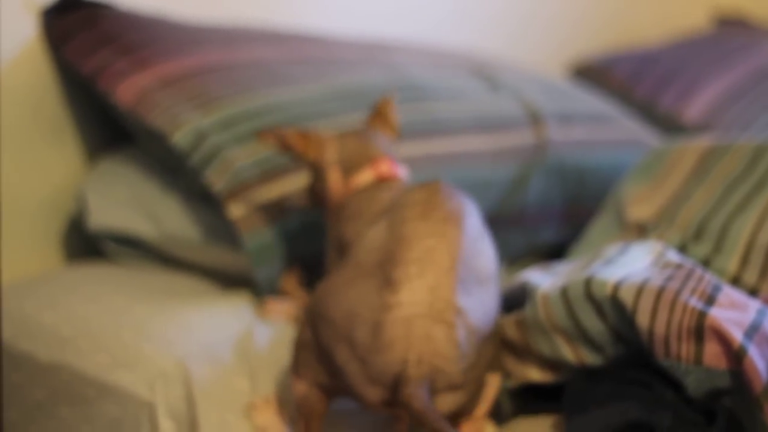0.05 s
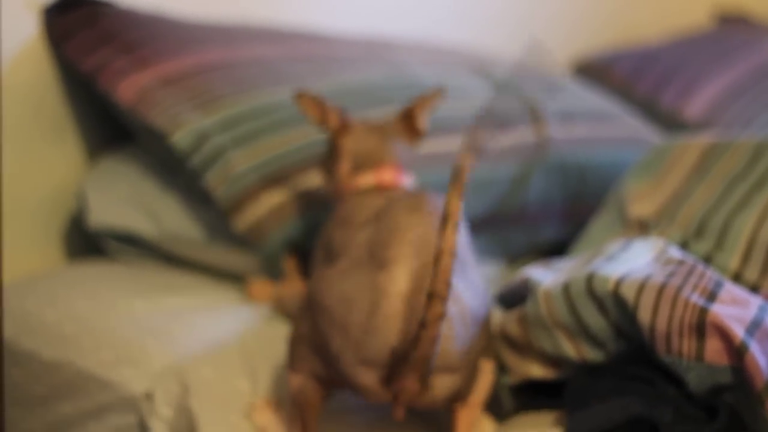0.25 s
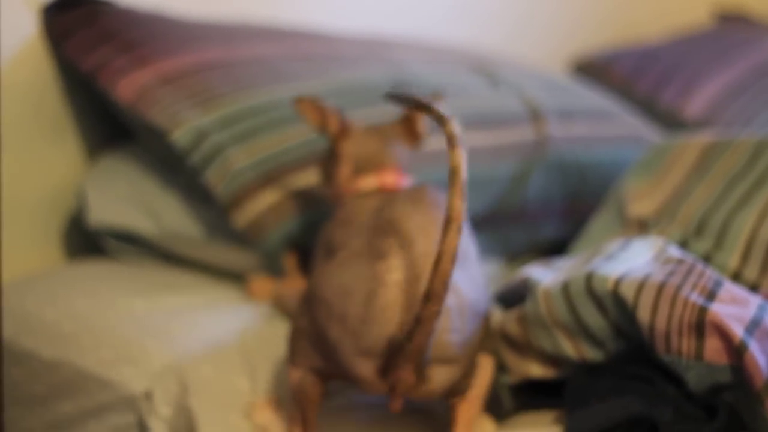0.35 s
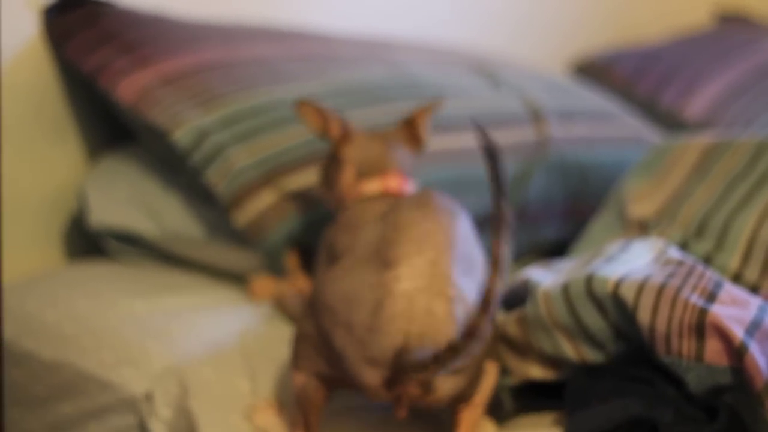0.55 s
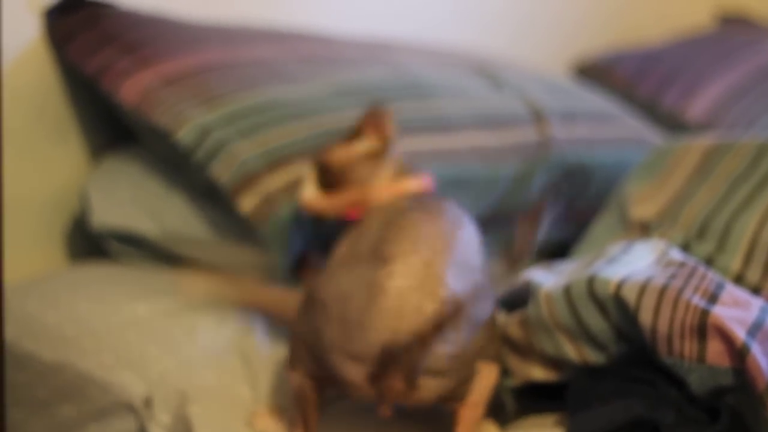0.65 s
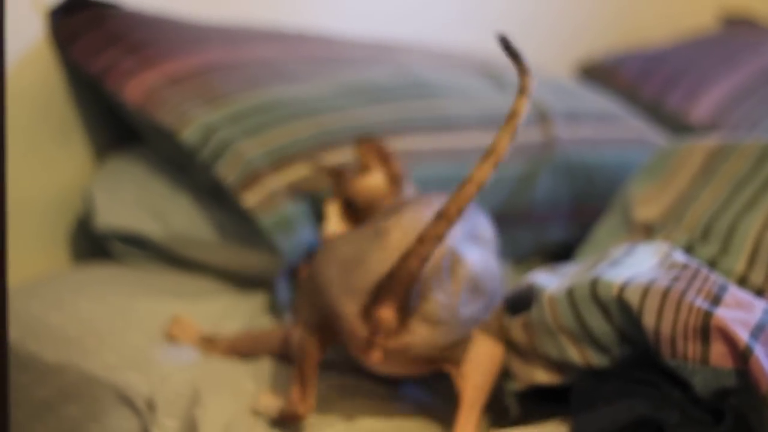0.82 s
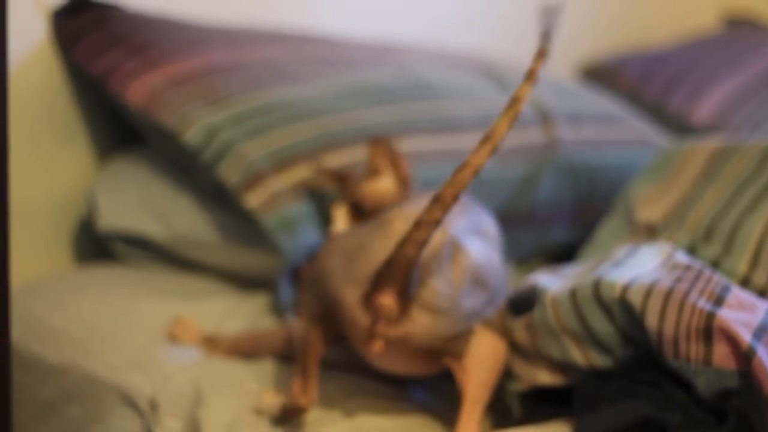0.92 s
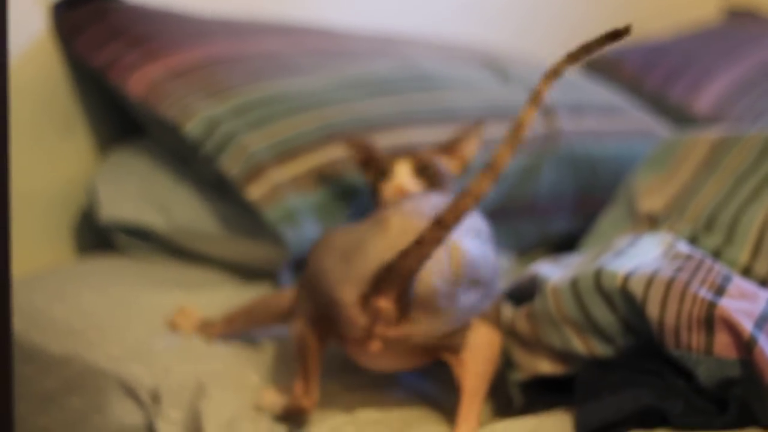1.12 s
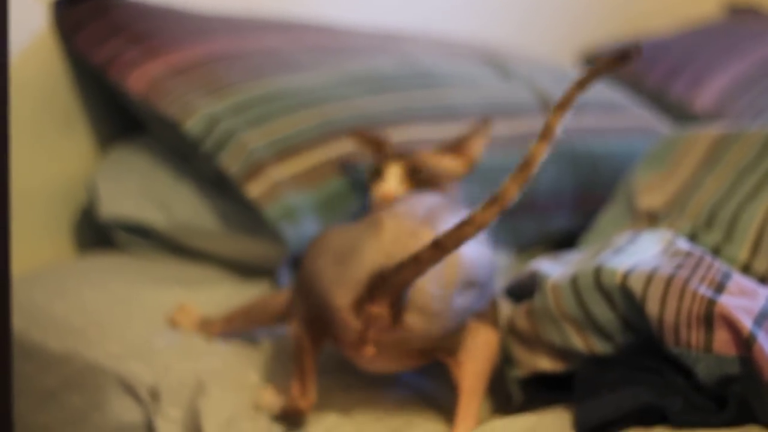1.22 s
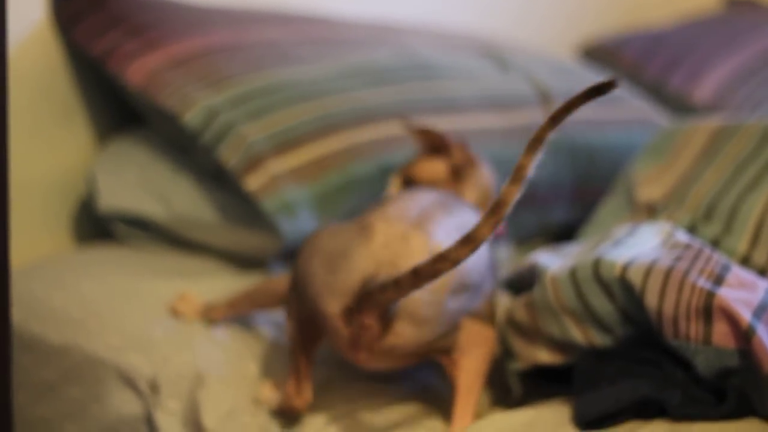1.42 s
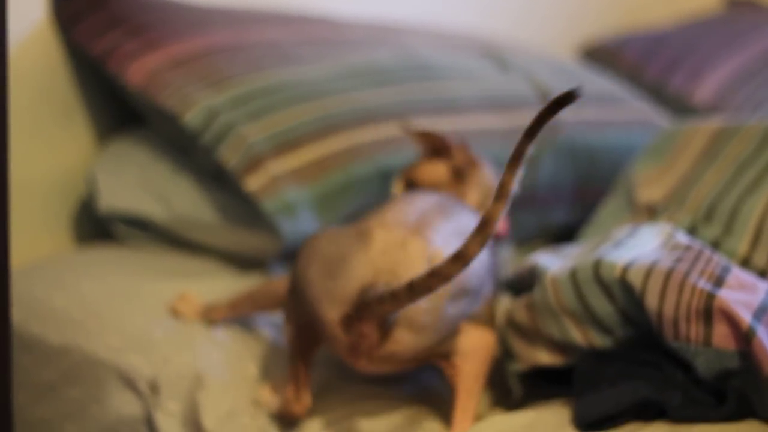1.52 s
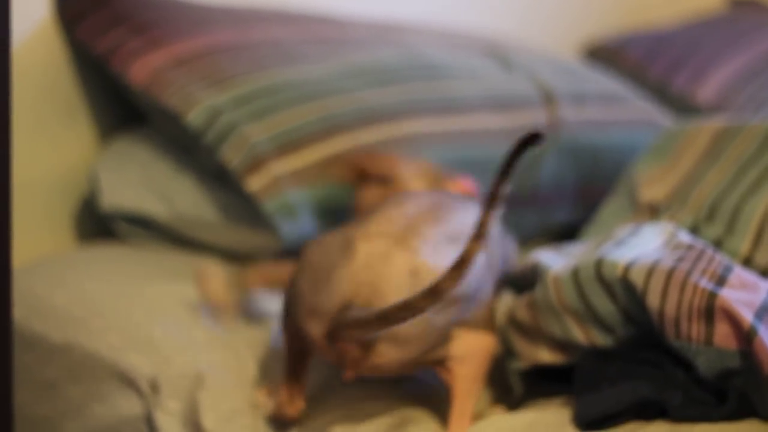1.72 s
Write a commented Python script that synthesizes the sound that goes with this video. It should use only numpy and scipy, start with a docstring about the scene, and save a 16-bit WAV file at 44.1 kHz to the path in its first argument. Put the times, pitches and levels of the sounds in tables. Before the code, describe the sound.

A cat's little collar bell tinkles unevenly as the cat shifts on a bed.

```python
"""A cat's collar bell

A cat shifts about on a bed in a small room, and the little bell on its collar jingles in bursts.
A pellet strikes and rolls inside the shell; fur chokes the ring, and the room carries it on.
The bedding rustles and thumps softly under the paws, and there is one light knock.
Behind it all, a fan hums and blows air."""
import sys
import numpy as np
from scipy import signal
from scipy.fft import rfft, irfft, next_fast_len
from scipy.io import wavfile
from scipy.ndimage import map_coordinates

SR = 44100
rng = np.random.default_rng(int(sys.argv[2]) if len(sys.argv) > 2 else 0)


def unload_wav(signal):
    """Save mono or channel-first audio to the path in sys.argv[1] as 16-bit WAV at rate SR, clipped to [-1, 1]."""
    wavfile.write(
        sys.argv[1],
        SR,
        np.round(np.clip(np.atleast_2d(signal).T, -1, 1) * 32767).astype(np.int16),
    )


N = 77175

# The pellet hits the shell. A fade time is how long a sound takes to drop by 60 dB.
# The last four columns are relative to the strike's level.
# (time [s], level [dB], fade time [s], low overtone [dB], high overtone [dB], click [dB], rattle [dB])
PELLET_STRIKES = [(.000, -36, 0.021, -28, -33, -29, -31), (.066, -51.5, 0.043, -12, -20, -17, -30),
                  (.196, -34.5, 0.032, -24, -30, -22, -9), (0.212, -21, 0.029, -31, -32, -19, -26),
                  (0.221, -29, 0.11, -30, -26, -24, -24), (0.2269, -21.5, 0.069, -30, -20, -15, -22),
                  (.239, -26.5, 0.099, -31, -14, -31, -24), (0.246, -23, 0.038, -34, -15, -24, -22),
                  (0.258, -42, 0.061, -25, -25, -21, -17), (.281, -34.5, 0.031, -22, -4, -22, -16),
                  (0.2918, -30, 0.06, -28, -20, -12, 1), (0.306, -45, 0.033, -23, -18, 14.5, -12),
                  (0.3312, -43, 0.057, -36, -34, -32, -12), (0.335, -30.5, 0.075, -24, -29, -18, -5),
                  (0.365, -29.5, 0.012, -30, -24, -23, -6), (0.378, -32.5, 0.046, -33, -28, -23, -14),
                  (0.4582, -25, .02, -33, -30, -13.5, -24), (0.471, -26, 0.022, -36, -36, -29, -28),
                  (0.488, -30.5, 0.05, -31, -28, -29, -6), (0.5231, -33, 0.025, -39, -34, -24, -26),
                  (0.68, -20, 0.044, -35, -30, -19, -18), (0.6829, -9.5, 0.015, -20, -29.5, -16.5, -25),
                  (.720, -10.5, 0.01, -34, -28, -26, -8.5), (0.726, -35, 0.045, -8, -24, -22, 4),
                  (0.7495, -28, 0.053, -24, -24, -5, -9), (.755, -36, 0.023, -20, -20, -1, -7),
                  (.771, -40, 0.04, -4, -18, 5, -14), (.779, -22, 0.033, -22, -32, -22, -1),
                  (.789, -20.5, 0.045, -32, -32, -17, -17), (0.7929, -13.5, 0.0073, -31, -33, -10.5, -14),
                  (0.7999, -22.5, 0.078, -29, -29, -23, -18), (.830, -41, 0.017, -14, -8, -11, -16),
                  (1.0772, -38, 0.083, -17, -32, -13, -21), (1.087, -36, 0.054, -13, -24, -6, -14),
                  (1.1203, -27.5, 0.0062, -25, -23, 3.5, -5), (1.128, -29.5, .02, -24, -23, 1.5, -10),
                  (1.14, -46, 0.026, -18, 3, -16, -10), (1.1471, -22.5, 0.028, -32, -18, -6.5, 4),
                  (1.159, -28, 0.016, -25, -11, -3, 1), (1.2116, -25.5, 0.028, -21, -5.5, -8.5, -1),
                  (1.271, -37.5, .025, -17, -9, -10, -5), (1.315, -51, 0.034, -8, -12, -14, -8),
                  (1.362, -45, 0.094, -28, -28, -20, -8), (1.3719, -39, 0.023, -29, -27, -31, 4),
                  (1.381, -49, 0.014, -27, -12, -15, -15), (1.4704, -35, 0.072, -20, -24, -31, 6),
                  (1.501, -37.5, 0.037, -29, -25, -18, -2.5), (1.5855, -37, 0.036, -26, -26, -25, -1),
                  (1.6384, -52, 0.032, -26, -26, -18, -15), (1.733, -49, .02, -26, -28, -16, -8)]
# Weaker tones of the slit shell (pitch [Hz], level next to the main tone [dB], fade time [s])
SLIT_TONES = [(5360, -14, 0.028), (5746, -10, 0.039), (4774, -30, 0.048), (6390, -24.5, 0.028)]
# Tone colour of the pellet's click (frequency [Hz], level [dB])
CLICK_COLOUR = [(1000, -40), (3000, -9), (5000, -22), (7000, 14), (10000, -1.5), (16000, -32)]
# Loudness of the bedding's bright rustle (time [s], level [dB])
RUSTLE_LEVELS = [(0, -69), (.12, -66.5), (.18, -57.5), (.23, -45), (.29, -49.5), (.4, -66.5), (.63, -68),
                 (.68, -47.5), (.77, -48.5), (.83, -51), (.9, -64), (1.05, -66.5), (1.11, -56), (1.17, -73),
                 (1.3, -62), (1.67, -64.5), (1.705, -54), (1.75, -60.5)]
# Tone colour of that rustle (frequency [Hz], level [dB])
RUSTLE_COLOUR = [(500, -2), (2000, -3.5), (4000, -5), (7000, 2.5), (10000, -9), (15500, -17.5)]
# Loudness of the bedding's dull swish (time [s], level [dB])
SWISH_LEVELS = [(0, -55.5), (.6, -55), (.72, -47), (.9, -71), (1.15, -54), (1.36, -46), (1.45, -48),
                (1.52, -47), (1.59, -47.5), (1.67, -48.5), (1.75, -48)]
# Tone colour of that swish (frequency [Hz], level [dB])
DULL_COLOUR = [(150, -25), (450, -11.5), (800, 0.5), (1100, -1.5), (1600, -13), (2500, -28), (6000, -49)]
# Steps and scuffs (time [s], level [dB], centre [Hz], half-width [octaves], rise [s], fade time [s])
PAW_STEPS = [(.255, -58, 1890, 0.4, .01, 0.13), (.712, -48, 170, 0.65, 0.0042, 0.062),
             (.762, -42.5, 1660, 1.1, 0.0034, 0.087), (0.766, -53, 75, 1.4, 0.015, 0.16),
             (1.073, -41, 150, 1.15, 0.0039, 0.043), (1.1177, -38.5, 4400, .35, 0.00074, 0.091),
             (1.46, -42.5, 111, 1.05, 0.005, 0.056), (1.599, -53, 1800, 0.38, 0.02, .12),
             (1.638, -34, 780, 0.1, 0.0012, 0.034), (1.6585, -41, 804, 0.2, 0.00075, 0.054)]
# Tones of the knock (pitch [Hz], relative level [dB], fade time [s])
KNOCK_TONES = [(1293, 2.5, 0.066), (1520, -9, 0.023), (2220, -4.5, 0.012)]
# Tone colour of the fan's rushing air (frequency [Hz], level [dB])
AIR_COLOUR = [(10, -29), (25, -23), (70, -18), (125, -9.5), (242, -7), (400, -9), (591, -5), (1040, -7),
              (1500, -11), (2200, -18.5), (3620, -22), (5500, -22), (8000, -30.5), (12000, -44.5),
              (16000, -36.5)]
# Narrow bands where that air drones (centre [Hz], width [Hz], level [dB])
DRONE_BANDS = [(611.6, 36, -56), (720, 14, -62), (825, 81, -63.5), (978, 23, -59.5), (1067.6, 17, -60)]
# Tones of the fan's hum (pitch [Hz], level [dB])
HUM_TONES = [(120, -65.5), (154, -67.5), (307, -62), (326, -56.5), (402, -67.5), (1561, -66.5)]
# How long the room's echo lasts (frequency [Hz], fade time [s])
ECHO_FADES = [(200, 0.48), (2000, 0.22), (5500, 0.21), (9000, 0.16), (14000, 0.12)]
# Tone colour of the echo (frequency [Hz], level [dB])
ECHO_COLOUR = [(200, -22), (5500, -0.5), (9000, -2), (13500, -3)]

BELL_HZ, LOW_OVERTONE_HZ, HIGH_OVERTONE_HZ = 5582, 13170, 13465
OVERTONE_FADE_S, CLICK_FADE_S, RING_RISE_S = 0.031, 0.0044, 0.00026
LOUD_DB, ECHO_CUT_PER_DB = -19.5, 0.53  # strikes louder than this get less echo and sound closer


def bell(detune=0.0031):
    """Each strike of the pellet makes a click, rings the shell and sets off a short rattle."""
    out, t = np.zeros(N), np.arange(SR // 6) / SR
    click_noise = noise(CLICK_COLOUR)
    # so small a shell sends out little low sound
    low_cut = signal.butter(N=4, Wn=4210, btype="high", fs=SR, output="sos")
    for start, db, fade_s, low_db, high_db, click_db, rattle_db in PELLET_STRIKES:
        tones = [(BELL_HZ, 0, fade_s), (LOW_OVERTONE_HZ, low_db, OVERTONE_FADE_S),
                 (HIGH_OVERTONE_HZ, high_db, OVERTONE_FADE_S)] + SLIT_TONES
        ring = np.zeros(len(t))
        for hz, tone_db, tone_fade_s in tones:
            pitch = hz * (1 + detune * rng.normal())
            ring += amp(tone_db) * fade(t, tone_fade_s) * np.sin(2 * np.pi * (pitch * t + rng.random()))
        ring *= np.sqrt(2) * (1 - np.exp(-t / RING_RISE_S))
        shell = signal.sosfilt(low_cut, ring + amp(rattle_db) * rattle(t))
        click = amp(click_db) * fade(t, CLICK_FADE_S) * np.roll(click_noise, rng.integers(N))[:len(t)]
        echo_cut_db = ECHO_CUT_PER_DB * max(db - LOUD_DB, 0)
        add(out, start, amp(db) * room(shell + click, echo_cut_db))
    return out


def rattle(t, touches=24, touches_per_s=690, settle_s=0.017, centre_hz=5756, pitch_spread=0.051):
    """The rolling pellet touches the shell ever more lightly, pulling each tiny ring off pitch."""
    out, ring_t = np.zeros(len(t)), t[:SR // 100]
    shape = fade(ring_t, fade_s=0.0091) * (1 - np.exp(-ring_t / RING_RISE_S))
    starts = np.cumsum(rng.exponential(1 / touches_per_s, touches))
    pitches = centre_hz * (1 + pitch_spread * rng.standard_normal(touches))
    for start, hz in zip(starts, pitches):
        add(out, start, np.exp(-start / settle_s) * shape * np.sin(2 * np.pi * hz * ring_t))
    return out


def bedding(grain_db=3):
    """Moving cloth makes a grainy rustle, with a duller swish beneath it."""
    rustle = unit(noise(RUSTLE_COLOUR) * amp(grain_db * wobble(500)))
    swish = noise(DULL_COLOUR) * amp(wobble(39.43))
    return loudness(RUSTLE_LEVELS) * rustle + loudness(SWISH_LEVELS) * swish


def paws():
    """Each step or scuff is a short puff of noise, low on the mattress and high on the cloth."""
    out, t = np.zeros(N), np.arange(SR // 4) / SR
    for start, db, hz, octaves, rise_s, fade_s in PAW_STEPS:
        puff = shaped_noise(lambda f: 1 / (1 + (np.log2((f + 1) / hz) / octaves) ** 4))
        shape = np.minimum(t / rise_s, 1) * fade(np.maximum(t - rise_s, 0), fade_s)
        add(out, start, amp(db) * puff[:len(t)] * shape)
    return out


def knock(start_s=1.399, level_db=-36.5):
    """One light, dull knock: three tones that die away quickly in the room."""
    out, t = np.zeros(N), np.arange(SR // 6) / SR
    tones = sum(amp(level_db + db) * fade(t, fade_s) * np.sin(2 * np.pi * hz * t)
                for hz, db, fade_s in KNOCK_TONES)
    add(out, start_s, room(tones))
    return out


def fan(air_db=-50):
    """A fan blows a steady rush of air that drones at a few pitches, over a slightly wavering hum."""
    t = np.arange(N) / SR
    hum = sum(amp(db) * np.sqrt(2) * np.sin(2 * np.pi * hz * t + 0.23 * wobble(5.67))
              for hz, db in HUM_TONES)
    drone = sum(amp(db) * shaped_noise(lambda f: 1 / (1 + (2 * (f - hz) / width) ** 2))
                for hz, width, db in DRONE_BANDS)
    return amp(air_db) * noise(AIR_COLOUR) + hum + drone


def room(sound, echo_cut_db=0, echo_db=-5.5, build_s=0.0042):
    """The bedroom adds a short, blurred echo whose high notes die first."""
    hz, t, bands = signal.stft(rng.standard_normal(SR // 3), SR, nperseg=256)
    bands *= fade(t, value_at(ECHO_FADES, hz)[:, None])
    bands *= amp(value_at(ECHO_COLOUR, hz))[:, None]
    bands *= 1 - np.exp(-t / build_s)
    echo = signal.istft(bands, SR, nperseg=256)[1]
    out = amp(echo_db - echo_cut_db) * signal.fftconvolve(sound, echo / np.linalg.norm(echo))
    add(out, 0, sound)
    return out


def amp(db):
    """Turn decibels into a number to multiply a sound by."""
    return 10 ** (np.asarray(db) / 20)


def unit(sound):
    """Scale a sound to an average strength (rms) of 1."""
    return sound / np.sqrt(np.mean(sound ** 2) + 1e-20)


def value_at(table, hz):
    """Read between the rows of a (frequency, value) table, with octaves evenly spaced."""
    frequencies, values = np.transpose(table)
    return np.interp(np.log(hz + 1), np.log(frequencies + 1), values)


def loudness(table):
    """Turn a (time, level) table into a smoothly changing volume."""
    return amp(np.interp(np.arange(N) / SR, *np.transpose(table)))


def wobble(per_s):
    """A smooth curve through per_s random values each second."""
    points = rng.standard_normal(int(N * per_s / SR) + 4)
    return map_coordinates(points, [np.arange(N) * per_s / SR])


def filtered(sound, gain_at):
    """Turn each frequency f of a sound up or down by gain_at(f)."""
    size = next_fast_len(N + SR // 2)
    return irfft(rfft(sound, size) * gain_at(np.fft.rfftfreq(size, 1 / SR)), size)[:N]


def shaped_noise(gain_at):
    """Filtered hiss of strength 1."""
    return unit(filtered(rng.standard_normal(N), gain_at))


def noise(colour):
    """Hiss of strength 1, shaped by a tone colour table."""
    return shaped_noise(lambda f: amp(value_at(colour, f)))


def fade(t, fade_s):
    """A dying curve that is 60 dB down after fade_s seconds."""
    return np.exp(-np.log(1000) * t / fade_s)


def add(track, start_s, sound):
    """Mix a sound into the track at the given time."""
    part = track[max(0, round(start_s * SR)):][:len(sound)]
    part += sound[:len(part)]


def scene():
    """The bell, the bed, the knock and the fan together in one channel."""
    return (bell() + bedding() + paws() + knock() + fan())[None]


def record(dry, top_hz=16100):
    """Cut away the very highest treble."""
    return filtered(dry[0], lambda f: f < top_hz)[None]


dry = scene()
out = record(dry)
unload_wav(out)
```